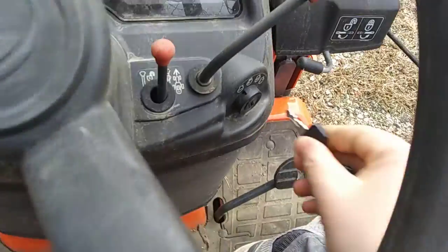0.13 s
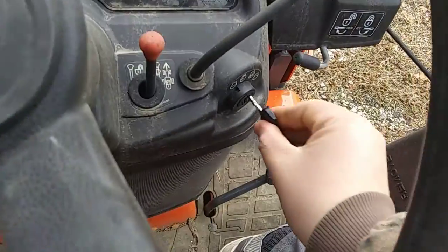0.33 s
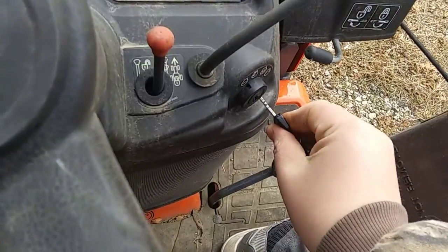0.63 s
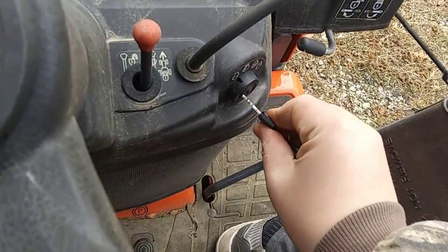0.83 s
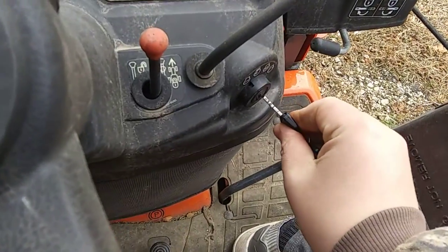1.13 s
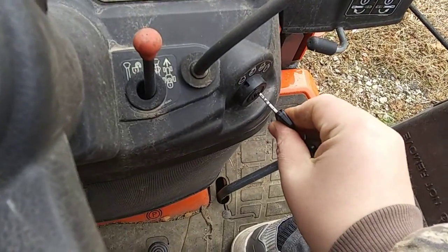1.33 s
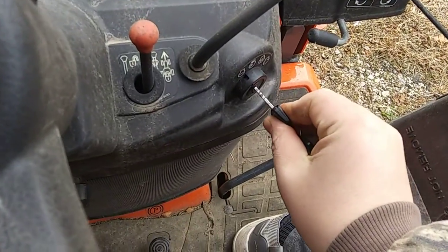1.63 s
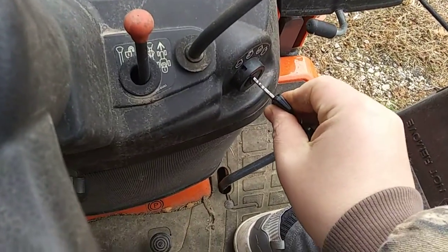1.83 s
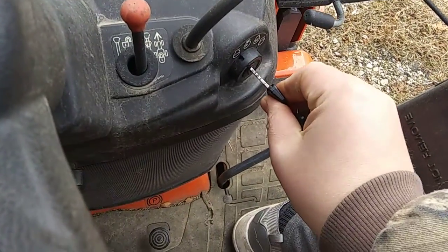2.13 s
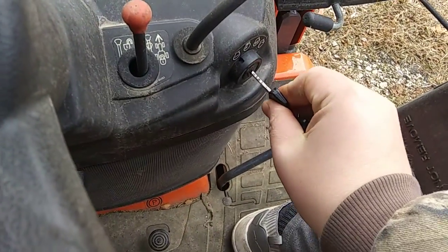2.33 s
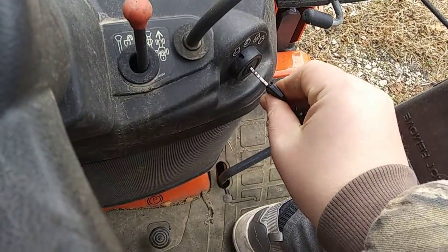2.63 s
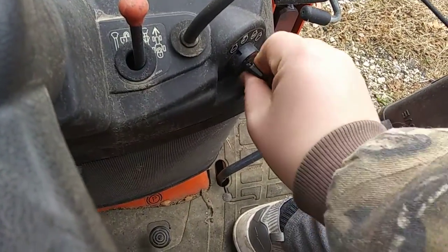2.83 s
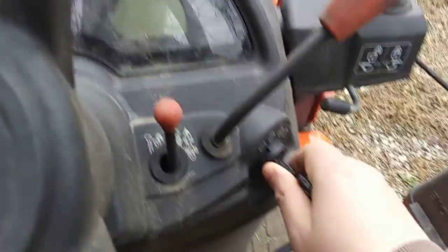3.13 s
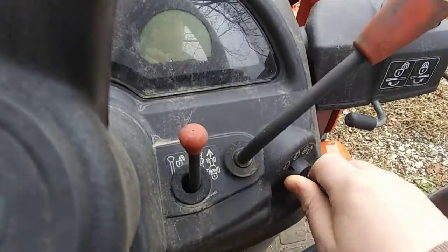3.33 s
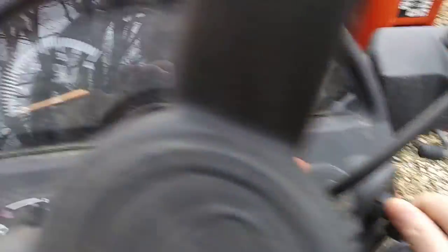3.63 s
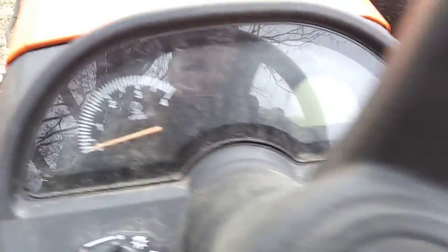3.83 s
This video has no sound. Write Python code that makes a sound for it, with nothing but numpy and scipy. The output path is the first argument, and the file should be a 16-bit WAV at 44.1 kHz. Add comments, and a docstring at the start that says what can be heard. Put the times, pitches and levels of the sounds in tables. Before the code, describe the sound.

A key clicks in a tractor's ignition, close up in quiet outdoor air. A sleeve swishes faintly at first, then the key taps the lock at 0.9 seconds, with lighter ticks until 1.7. Around 2.9 it slides in with quick metallic clicks and hollow plastic knocks, followed by soft hand rubbing and small clicks. At 3.5 the switch clacks loudly, and a relay chatters rapidly until 4 seconds.

```python
"""At the driver's seat of a parked tractor, in quiet outdoor air. A jacket sleeve swishes by friction as
a hand brings a key to the ignition. The key taps the lock, slides in over the wafers and is turned;
each impact rings the metal and excites the modes of the hollow plastic dashboard. The switch snaps on
with one loud clack, then a relay chatters behind the panel. Nearby surfaces return short echoes."""
import sys
import numpy as np
from scipy import signal
from scipy.fft import rfft, irfft
from scipy.io import wavfile

SR = 44100
rng = np.random.default_rng(int(sys.argv[2]) if len(sys.argv) > 2 else 0)


def transcribe(u):
    """Save the signal u as a 16-bit wav file named by the first command-line argument.

    u: samples, shape (n,) or (channels, n), limited to [-1, 1]; the rate is SR.
    q: integer samples, one column per channel.
    """
    v = np.clip(np.atleast_2d(u).T, -1, 1)
    q = np.round(v * 32767).astype(np.int16)
    wavfile.write(sys.argv[1], SR, q)


N = 176400
T = np.arange(N) / SR
RING_T = T[:SR // 2]  # time since an impact, in seconds


def amp(db):
    """Amplitude ratio: a factor of ten for every 20 dB."""
    return 10 ** (np.asarray(db) / 20)


def unit(x):
    """Normalisation to an energy of one."""
    return x / np.sqrt(np.sum(x ** 2) + 1e-20)


def per_ms(x):
    """Normalisation to the energy of one millisecond at full level."""
    return unit(x) * np.sqrt(SR / 1000)


def decay(t60):
    """Exponential damping: the envelope loses 60 dB in t60 seconds."""
    return amp(-60 * RING_T / t60)


def level(curve):
    """Gain over time, linear in decibels between (seconds, dB) points."""
    return amp(np.interp(T, *np.transpose(curve)))


def add(out, start_s, sound):
    """Superposition: a sound adds to the others from its start time on."""
    i = int(start_s * SR)
    out[i:i + len(sound)] += sound[:max(N - i, 0)]


def colour(x, spectrum):
    """Minimum-phase filtering through (Hz, dB) points: no response precedes its cause."""
    size = 2 * len(x)
    hz, db = np.transpose(spectrum)
    bin_hz = np.fft.rfftfreq(size, 1 / SR)
    log_gain = np.log(amp(np.interp(np.log(bin_hz + 1), np.log(hz), db)))
    cepstrum = irfft(log_gain)[:size // 2]
    cepstrum[1:] *= 2  # folded onto positive time
    response = np.exp(rfft(cepstrum, size))
    return irfft(rfft(x, size) * response)[:len(x)]


def low_pass(x, hz):
    """Low-pass filtering: a softer contact has less treble."""
    return signal.sosfilt(signal.butter(2, min(hz, .45 * SR), fs=SR, output="sos"), x)


def high_pass(x, hz):
    """Radiation efficiency: a small panel radiates little bass."""
    return signal.sosfilt(signal.butter(4, hz, "high", fs=SR, output="sos"), x)


def modes(table, scatter_db, detune=0):
    """Free vibration: damped sines, scattered on each blow in level and, by the share detune, in pitch."""
    draws = rng.standard_normal((len(table), 2))
    return sum(amp(db + scatter_db * a) * decay(t60) * np.sin(2 * np.pi * hz * (1 + detune * b) * RING_T)
               for (hz, db, t60), (a, b) in zip(table, draws))


def dense_ring(spectrum, t60, tail_db, tail_t60, crack_gain):
    """Modal overlap: close modes merge into noise, with a sharp crack, a fast decay and a duller tail."""
    early, late = rng.standard_normal((2, len(RING_T)))
    envelope = crack_gain * decay(t60=.0026) + decay(t60)
    tail = amp(tail_db) * decay(tail_t60) * low_pass(late, hz=5500)
    return colour(early * envelope + tail, spectrum)


def outdoor_air():
    """Ambient noise: a quiet broadband background, strongest in the low mids, with a faint hiss."""
    # Loudness of the air. Each row: time in seconds, level in dB.
    air_level = [(0, -60), (1, -64.5), (1.5, -65), (2.2, -65), (2.8, -63.5), (3.3, -61.5), (4, -59.5)]
    # Spectrum of the air. Each row: frequency in Hz, relative level in dB.
    air_spectrum = [(18, -48), (30, -36), (102, -27), (123, -20.5), (225, -3), (307, -3), (369, -2.5),
                    (399, -1.5), (622, -3.5), (1020, -9), (1230, -10.5), (1330, -10), (3400, -15),
                    (7460, -26.5), (15500, -19)]
    noise = colour(rng.standard_normal(N), air_spectrum)
    return level(air_level) * np.sqrt(N) * unit(noise)


def friction(curve, spectrum):
    """Stick-slip friction: the hiss of cloth or skin turns uneven as it catches and slips."""
    grain_db, grains_per_s = 1.5, 140
    catches = rng.standard_normal(4000)
    grain = amp(grain_db * np.interp(T * grains_per_s, np.arange(len(catches)), catches))
    hiss = colour(rng.standard_normal(N) * grain, spectrum)
    return level(curve) * np.sqrt(N) * unit(hiss)


def sleeve_swish():
    """Sliding friction of cloth: the sleeve swishes as the hand reaches for the lock."""
    # Course of the swish. Each row: time in seconds, level in dB.
    swish_level = [(0, -54.5), (.1, -53), (.2, -51), (.3, -57), (.42, -61.5), (.55, -66.5), (.65, -81),
                   (.8, -66), (.95, -84)]
    # Spectrum of the sliding cloth. Each row: frequency in Hz, relative level in dB.
    cloth_spectrum = [(60, -37.5), (150, -11), (300, 2), (700, 0), (1500, -2.5), (3000, -4.5), (6800, -6.5),
                      (8000, -14.5), (16000, -16)]
    return friction(swish_level, cloth_spectrum)


def hand_rub():
    """Sliding friction of skin: a duller rub of the hand on key and panel."""
    # Course of the rub. Each row: time in seconds, level in dB.
    rub_level = [(2.6, -72), (2.8, -61.5), (3.0, -56.5), (3.06, -60), (3.16, -54), (3.23, -54), (3.29, -84),
                 (3.78, -72), (3.87, -53.5), (3.94, -50), (4, -54.5)]
    # Spectrum of the sliding skin. Each row: frequency in Hz, relative level in dB.
    skin_spectrum = [(60, -44), (150, -22), (300, 5.5), (700, -1.5), (1600, -3), (2700, 1), (3600, -17),
                     (7000, -21), (16000, -34)]
    return friction(rub_level, skin_spectrum)


def echoes(x):
    """Diffuse reflection: steering wheel, floor and fenders return a short wash of echoes."""
    # Spectrum of the reflections. Each row: frequency in Hz, relative gain in dB.
    echo_spectrum = [(100, -7), (300, 9.5), (1000, -5), (4000, -2), (8000, -5.5), (16000, -5)]
    gain_db, rise_s = -18.5, .0073
    reflections = rng.standard_normal(len(RING_T)) * decay(t60=.17) * np.minimum(RING_T / rise_s, 1)
    response = colour(unit(reflections), echo_spectrum)
    return amp(gain_db) * signal.fftconvolve(x, response)[:N]


def relay_chatter():
    """Repeated impact: each stroke rings the same parts, so ticks sound alike; a softer rebound follows."""
    # Strokes of the relay, about 22 a second. Each row: start in seconds, level in dB.
    strokes = [(3.5090, -31), (3.5595, -38.5), (3.6077, -52.5), (3.6525, -33), (3.6962, -36), (3.7413, -33),
               (3.7847, -33), (3.828, -40.5), (3.8740, -35.5), (3.9189, -34), (3.9620, -36)]
    # Ring of the hidden parts. Each row: frequency in Hz, relative level in dB.
    relay_spectrum = [(100, -42), (250, -5.5), (400, 3.5), (700, -10.5), (1500, -7.5), (2500, -5.5),
                      (3200, 0), (4400, -1.5), (5300, -10.5), (6500, -18), (8000, -30), (16000, -36)]
    rise_s, tail_db, variation = .0044, -18, .32
    rebound_s, rebound_db = .013, -11
    out = np.zeros(N)
    common = rng.standard_normal((2, len(RING_T)))
    envelope = np.minimum(RING_T / rise_s, 1) * (decay(t60=.035) + amp(tail_db) * decay(t60=.12))
    for start_s, db in strokes:
        stroke, rebound = (common + variation * rng.standard_normal(common.shape)) * envelope
        add(out, start_s, amp(db) * per_ms(colour(stroke, relay_spectrum)))
        add(out, start_s + rebound_s, amp(db + rebound_db) * per_ms(colour(rebound, relay_spectrum)))
    return out


def column_boom():
    """Resonance: the key bottoms out and sets the hollow column cover ringing."""
    # Modes of the cover. Each row: frequency in Hz, relative level in dB, 60 dB decay time in seconds.
    cover_modes = [(296, -4.5, 0.25), (327, 0.5, 0.091), (423.3, -10, 0.25), (890, -15, .12)]
    boom = high_pass(modes(cover_modes, scatter_db=.5), hz=171)
    out = np.zeros(N)
    add(out, start_s=.9265 + 2, sound=amp(-29) * boom)
    return out


def key_tip():
    """Hard impact: one dry metal tap as the key misses the slot and hits the face of the lock."""
    # Ring of the tap. Each row: frequency in Hz, relative level in dB.
    tap_spectrum = [(40, -55), (150, -45), (400, -11), (800, 3), (1100, 0.5), (1400, 6.5), (1800, 5),
                    (2250, -8), (3000, -5), (4000, 0), (4900, 1.5), (6200, -17.5), (8000, -29),
                    (11000, -32), (16000, -37)]
    tap = dense_ring(tap_spectrum, t60=.022, tail_db=-11, tail_t60=.042, crack_gain=1.2)
    out = np.zeros(N)
    add(out, start_s=.9282, sound=amp(-23) * per_ms(tap))
    return out


def key_contacts():
    """Structure-borne sound: each contact clicks in the metal lock and knocks the hollow dashboard."""
    # Impacts of key on lock. Each row: start in seconds, relative knock level in dB, knock centre in Hz,
    # relative click level in dB, click cut-off in Hz.
    contacts = [(.174, -41, 305, -43, 2000), (.459, -40.5, 450, -53, 2000), (.546, -58, 500, -50, 6500),
                (0.8973, -31, 456, -38, 3000), (0.9042, -30, 260, -52, 1200), (.931, -29.5, 320, -51, 1500),
                (.937, -34, 336, -30, 1500), (1.043, -50, 650, -65, 2000), (1.342, -44.5, 348, -61, 3000),
                (1.645, -34.5, 300, -42, 4020), (1.653, -40.5, 320, -53, 1500),
                (1.686, -47, 280, -53, 1500), (1.734, -37, 362, -46.5, 3530),
                (2.806, -37, 550, -30.5, 1800), (2.8404, -22.5, 540, -21.5, 10800),
                (2.862, -22, 550, -29, 3020), (2.8729, -28, 400, -22, 5000),
                (2.8761, -17, 440, -16.5, 9000), (2.8875, -21.5, 350, -15, 7000),
                (2.8895, -28, 500, -19, 12000), (2.899, -19.5, 500, -24, 4000),
                (2.9062, -17.5, 450, -18.5, 4030), (2.9095, -15, 650, -15.5, 4050),
                (2.917, -9.5, 352, -20.5, 13000), (2.925, -35, 330, -42, 1200),
                (2.956, -22, 280, -48, 2000), (2.977, -27, 242, -39, 3000), (3.131, -38.5, 500, -44, 14000),
                (3.178, -42, 500, -40, 13000), (3.1917, -25, 567, -32, 7000), (3.203, -46, 500, -41, 6000),
                (3.229, -37.5, 500, -44, 3000), (3.371, -35, 706, -45, 1800), (3.380, -58, 600, -52, 2000),
                (3.4678, -63, 600, -34.5, 15000), (3.476, -25, 640, -29, 1600),
                (3.4808, -41, 600, -18, 5500), (3.674, -33, 754, -39, 2000), (3.71, -35, 700, -43, 3000),
                (3.753, -33, 650, -31, 6040), (3.85, -38, 600, -34.5, 12000),
                (3.859, -42, 600, -39.5, 12000), (3.9577, -29.5, 700, -29, 12900)]
    # Dashboard modes. Each row: frequency in Hz, relative level in dB, 60 dB decay time in seconds.
    dash_modes = [(180, -18, 0.084), (270.7, -0.5, 0.096), (307, -7.5, 0.12), (388, -10.5, 0.075),
                  (463, -5, .07), (529, 1.5, 0.095), (675, 1.5, 0.041), (799, -0.5, 0.031),
                  (878, -2.5, 0.042), (1170, -28, 0.019), (1330, -16.5, 0.017), (1740, -24.5, .04)]
    # Ring of key and lock. Each row: frequency in Hz, relative level in dB.
    lock_spectrum = [(40, -61), (130, -30), (300, -11), (700, 4.5), (1200, 1), (1850, 2), (2300, 2.5),
                     (3200, -3.5), (4800, -1), (6500, -10), (10000, -7), (12000, -14), (16000, -6)]
    gain_db, rise_s = -5, .0013
    out = np.zeros(N)
    attack = np.minimum((RING_T + 1 / SR) / rise_s, 1)
    for start_s, knock_db, knock_hz, click_db, click_hz in contacts:
        dashboard = modes(dash_modes, scatter_db=3.5, detune=.021)
        knock = signal.lfilter(*signal.iirpeak(knock_hz, Q=1.23, fs=SR), dashboard)
        metal = dense_ring(lock_spectrum, t60=.019, tail_db=-13.5, tail_t60=.11, crack_gain=1.6)
        click = low_pass(attack * metal, click_hz)
        add(out, start_s, amp(knock_db) * per_ms(knock) + amp(click_db) * per_ms(click))
    return amp(gain_db) * high_pass(out, hz=223)


def switch_snap():
    """Release of elastic energy: the sprung switch hits its stop with a crack, then the housing rings."""
    # Bright crack at the stop. Each row: frequency in Hz, relative level in dB.
    crack_spectrum = [(30, -21), (110, -20), (200, -23), (400, 1), (650, 0), (1000, 5), (1350, -1.5),
                      (1900, 5), (2500, -10.5), (3400, -2.5), (4600, -5.5), (5800, -14), (7000, -7.5),
                      (9500, -8.5), (11500, -22), (14000, -23), (16000, -28)]
    # Housing modes. Each row: frequency in Hz, relative level in dB, 60 dB decay time in seconds.
    housing_modes = [(312, -16, 0.16), (387, -12, 0.085), (543, -2, 0.073), (582, 2, 0.049),
                     (668, 1, 0.054), (795, -9.5, 0.088), (863, -5.5, 0.063), (1110, -16, 0.053),
                     (1464, -14.5, 0.054), (1870, -18, 0.043), (2960, -13, 0.059), (3459, -11, 0.05),
                     (7370, -22, .03)]
    crack = dense_ring(crack_spectrum, t60=.026, tail_db=-21, tail_t60=.083, crack_gain=1.4)
    housing = high_pass(modes(housing_modes, scatter_db=-.5), hz=313)
    out = np.zeros(N)
    add(out, start_s=3.4925, sound=amp(-8) * per_ms(crack))
    add(out, start_s=3.4936, sound=amp(-18) * housing)
    return out


def scene():
    """Superposition in one channel: the impacts and their echoes, over sleeve, hand and air."""
    impacts = key_tip() + key_contacts() + column_boom() + switch_snap() + relay_chatter()
    return (impacts + echoes(impacts) + sleeve_swish() + hand_rub() + outdoor_air())[None]


def record(dry):
    """Band limiting: a steep low-pass filter removes the highest treble."""
    cutoff_hz = 15900
    return signal.sosfilt(signal.ellip(10, .1, 80, cutoff_hz, fs=SR, output="sos"), dry)


dry = scene()
out = record(dry)
transcribe(out)
```